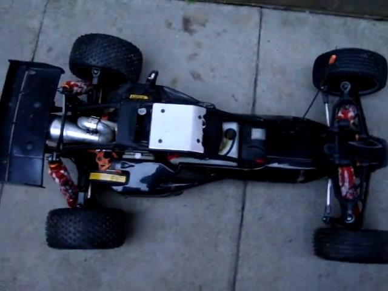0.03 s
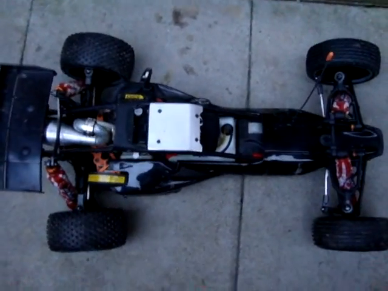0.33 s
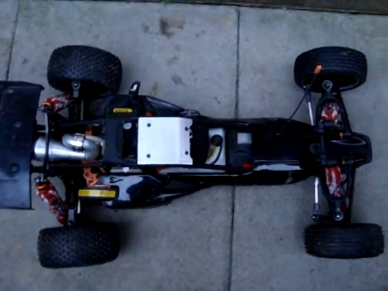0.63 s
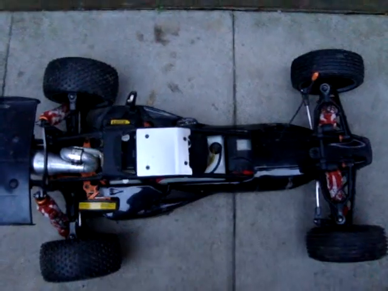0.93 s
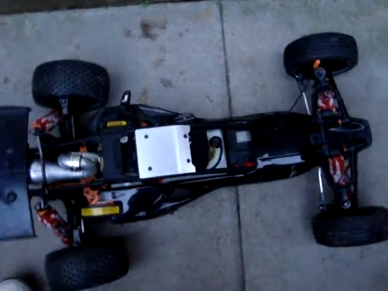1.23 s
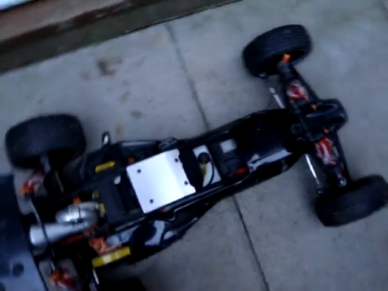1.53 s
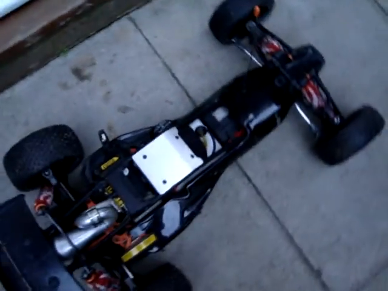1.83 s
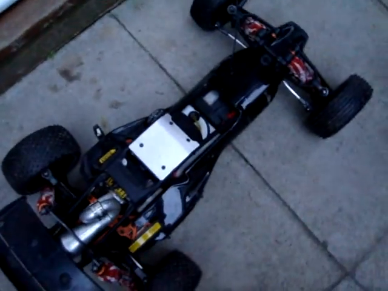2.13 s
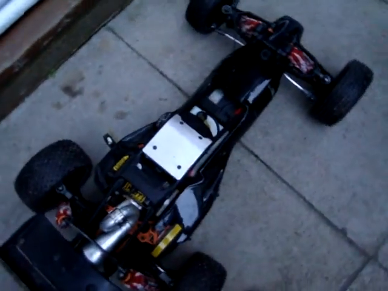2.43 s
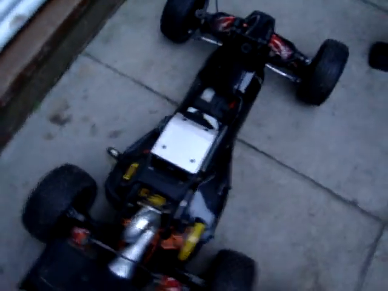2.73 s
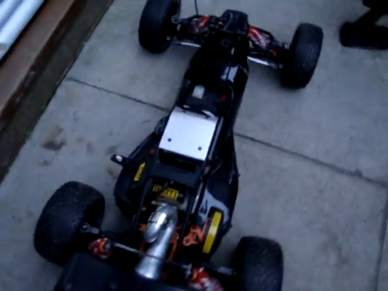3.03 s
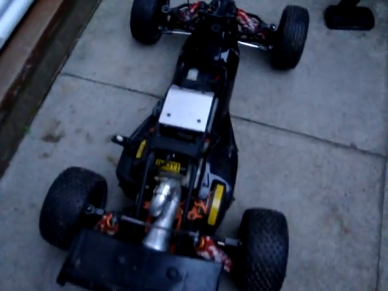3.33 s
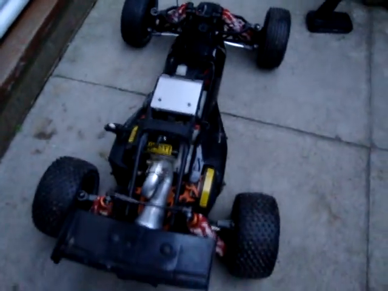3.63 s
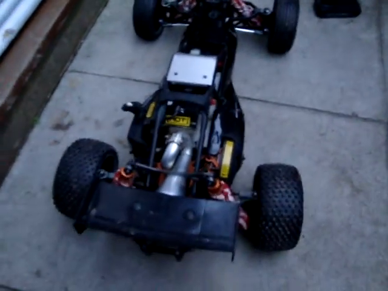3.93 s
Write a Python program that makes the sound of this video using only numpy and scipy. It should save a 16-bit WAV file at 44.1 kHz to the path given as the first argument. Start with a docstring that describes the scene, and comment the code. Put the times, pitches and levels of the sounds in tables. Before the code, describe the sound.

A small two-stroke model buggy engine idles close by throughout, with sharp, uneven, metallic pops, about a dozen a second, reflecting brightly off yard walls. From about 0.6 seconds it revs lightly: the pops crowd together over a louder drone and a faint whine. By 1.5 seconds it drops back to a sputtering idle, easing slightly near 4 seconds, over a faint outdoor background.

```python
"""The small two-stroke engine of a model buggy idles on paving in a walled yard, about 60 turns a second.
It mostly fires every fourth to sixth turn: each pop is a shock that echoes inside the exhaust pipe,
excites its modes and returns from the walls as a bright spray. Every turn drones, booms, puffs and
clatters, and the dragging clutch bell whines. Near one second the throttle opens and the pops crowd
together. The listener walks from the side round to the tail, over a faint outdoor background."""
import sys
import numpy as np
from scipy.fft import rfft, irfft, next_fast_len
from scipy.io import wavfile
from scipy.ndimage import uniform_filter1d, minimum_filter1d, map_coordinates

SR = 44100
rng = np.random.default_rng(int(sys.argv[2]) if len(sys.argv) > 2 else 0)


def inscribe(sig):
    """Save sig as 16-bit PCM at rate SR to the path in sys.argv[1].

    A 1-D sig is mono; a 2-D sig holds one channel per row.
    Samples are clipped to [-1, 1] before scaling.
    """
    pcm = np.round(np.clip(np.atleast_2d(sig).T, -1, 1) * 32767)
    wavfile.write(sys.argv[1], SR, pcm.astype(np.int16))


N = 176400
TIME = np.arange(N) / SR
IDLE_HZ, PIPE_ROUND_TRIP_S = 60.5, 0.00212

# Each row is one firing: start in seconds, then relative levels in dB of the pop, its treble over its
# midrange, the spray from the yard, the spray's top over the rest, and the gas jet.
FIRINGS = [(0.0487, -16, -4, -21.5, 2.5, -20), (0.115, -16.5, 8, -20.0, 4.5, -24),
           (0.1954, -18.5, 5, -21, 3.5, -23), (0.276, -21, 10, -22, 4.5, -21),
           (0.37, -21, 5, -24, 6.5, -20), (0.464, -15.5, -2, -23.5, 4.5, -26),
           (0.5919, -18, -20, -25.5, -3, -23.5), (0.6734, -16.5, -9, -21.5, 4, -20),
           (0.74, -16.5, 1, -22.0, -1, -20), (0.7915, -18.5, -4, -30, -3, -20),
           (0.8241, -15.5, -1, -24, 0, -17), (0.8737, -14.5, -12, -24.5, 1.5, -20),
           (0.94, -15.5, -13, -25.5, 0, -31), (0.9904, -15, -8, -27, -1, -19),
           (1.0411, -13.5, -5, -22.0, 3, -23), (1.1276, -15, -3, -28, -11, -15),
           (1.162, -17, -4, -30, -9, -17), (1.1975, -12.5, -7, -25, -2, -23.5),
           (1.2143, -17.5, -7, -31, 8.5, -23), (1.267, -13.5, -4, -23, -5, -16.5),
           (1.319, -15.5, 8, -22, 6, -23), (1.4067, -16, -7, -22.5, 7.5, -18),
           (1.4605, -20, -17, -31.0, -10, -27), (1.4785, -15.5, -4, -25.5, 4, -19),
           (1.548, -14, 9, -21.5, 4, -25), (1.6339, -19, 6, -21, 2, -18.5), (1.7332, -19, 1, -22.0, 5, -29),
           (1.8176, -17, 7, -22, 2.5, -29), (1.9015, -20, 11, -22.0, 3.5, -26),
           (1.986, -16, 7, -24.5, 2, -25), (2.0363, -20, -5, -29, -7, -24), (2.0532, -19, 1, -28, -4, -33),
           (2.1209, -19.5, 5, -21.0, 1, -31), (2.2043, -20, 3, -21, 3, -29),
           (2.289, -16.5, -1, -23, 1.5, -24), (2.3583, -18.5, 2, -30.5, -7, -18.5),
           (2.3916, -22, 2, -41, -16, -23), (2.4255, -20, 4, -22, 3.5, -19), (2.512, -18, 13, -20, 1, -31),
           (2.612, -18, 10, -22.5, 3, -32), (2.6955, -19.5, 13, -21.5, 3.5, -29),
           (2.7941, -17, 0, -22, 0.5, -31), (2.8751, -19.5, 4, -22.5, 4, -31),
           (2.9568, -19.5, 10, -23.5, 5, -35), (3.0387, -18.5, 3, -24.5, 4.5, -18.5),
           (3.1227, -17.5, 12, -23, 3.5, -23), (3.2211, -18, 12.5, -24, 4, -22),
           (3.3166, -18.5, -15, -23.5, 2.5, -26), (3.3836, -17, 8, -23, 5, -26),
           (3.4639, -19.5, -8, -22.5, 0, -19.5), (3.53, -17.5, -1, -23, 4.5, -31),
           (3.6123, -19.5, 6, -26, 5, -26), (3.7048, -19.5, -2, -24, 5, -32), (3.783, -23, 3, -24, 5, -24),
           (3.8637, -20, 1, -25, 4.5, -35), (3.9272, -24, -8, -26.0, 4.5, -22.5),
           (3.9937, -22, -10, -24, 7, -37)]
# Each row: time in seconds, throttle opening from 0 to 1.
THROTTLE = [(0, 0.52), (.4, 0.01), (.56, 0.53), (.75, 0.72), (1.0, 0.95), (1.31, 0.8), (1.35, 0.22),
            (1.7, 0.14), (2.4, 0.27), (2.8, 0), (4, 0)]
# The pipe's pitch sinks as the gas cools. Each row: time in seconds, pitch as a ratio.
PIPE_TUNE = [(0, 0.97), (1.4, 1), (2.4, 0.95), (3.0, .975), (3.9, 0.96)]


def amp(db):
    """Decibels to amplitude gain."""
    return 10 ** (np.asarray(db) / 20)


def unit(x):
    """Normalise to rms 1."""
    return x / np.sqrt(np.mean(x ** 2) + 1e-20)


def at(rows, s):
    """Linear interpolation of (seconds, value) rows."""
    return np.interp(s, *np.transpose(rows))


def colour(points, hz):
    """Gain of (Hz, dB) points interpolated on a log frequency axis."""
    f, db = np.transpose(points)
    return amp(np.interp(np.log(hz + 1), np.log(f + 1), db))


def wobble(rate):
    """A smooth random curve with rate knots a second."""
    return map_coordinates(rng.standard_normal(400), [TIME * rate], mode="wrap")


def filtered(x, response):
    """Linear filtering: the spectrum of x times a frequency response."""
    size = next_fast_len(len(x) + 8192)
    return irfft(rfft(x, size) * response(np.fft.rfftfreq(size, 1 / SR)), size)[:len(x)]


def coloured(x, points):
    """Filter by a spectrum of (Hz, dB) points, then normalise to rms 1."""
    return unit(filtered(x, lambda hz: colour(points, hz)))


def minimum_phase(gain):
    """The causal response with this gain, by folding the cepstrum."""
    cepstrum = irfft(np.log(np.maximum(gain, 1e-6)))
    half = len(cepstrum) // 2
    cepstrum[1:half] *= 2
    cepstrum[half + 1:] = 0
    return np.exp(rfft(cepstrum))


def add(track, start_s, sound):
    """Superpose a sound on the track."""
    i = max(round(start_s * SR), 0)
    part = track[i:i + len(sound)]
    part += sound[:len(part)]


def crank():
    """Turns made so far: a whole number between firings, smoothed by the flywheel's inertia."""
    starts = np.array(FIRINGS)[:, 0]
    starts = np.r_[starts[0] - 12 / IDLE_HZ, starts, starts[-1] + 12 / IDLE_HZ]
    between = np.maximum(np.round(np.diff(starts) * IDLE_HZ), 1)
    turns = np.interp(np.arange(-SR, N + SR) / SR, starts, np.r_[0, np.cumsum(between)])
    return uniform_filter1d(turns, size=4000)[SR:-SR]


def strokes(turns, decay_s, steady, turbulent, scatter_db, size=2048):
    """Amplitude-modulated noise: one burst a turn over a steady floor; the turbulent share never repeats."""
    count, part = np.divmod(turns, 1)
    age = part / IDLE_HZ
    repeating = rng.standard_normal(size)[(age * SR).astype(int)]
    grain = np.sqrt(1 - turbulent) * repeating + np.sqrt(turbulent) * rng.standard_normal(N)
    strength = amp(scatter_db * rng.uniform(-1, 1, size))
    return grain * (steady + np.exp(-age / decay_s) * strength[count.astype(int)])


def silencer_boom(turns):
    """Resonance: the gas pumped on each turn drives the cavities of the silencer and intake."""
    # Each row: centre in Hz, bandwidth in Hz, gain in dB.
    resonances = [(219, 35, -1), (287, 86, -0.5), (348, 69, 3), (418.4, 17.5, 5.5), (466, 146, -2),
                  (625.3, 45, 3.5), (678, 72, 1)]
    # The silencer's notches. Each row: frequency in Hz, gain in dB.
    notches = [(100, -24), (180, 0), (228, 2.5), (260, -5), (290, 1.5), (490, 1.5), (545, -12), (595, -2.5),
               (750, 1), (1500, -24)]

    def response(hz):
        modes = sum((-1) ** k * amp(db) * 1j * hz * width / (centre ** 2 - hz ** 2 + 1j * hz * width)
                    for k, (centre, width, db) in enumerate(resonances))
        return modes * colour(notches, hz)
    return unit(filtered(strokes(turns, decay_s=0.0071, steady=0.24, turbulent=1, scatter_db=0), response))


def puffs(turns):
    """Pulsating turbulent flow: every turn pushes out a puff of gas."""
    # Each row: frequency in Hz, gain in dB.
    spectrum = [(200, -35), (450, -11), (545, -2), (600, -4), (800, -6.5), (950, -8.5), (1080, 0.5),
                (1200, 1), (1380, -4.5), (1550, -14), (2100, -9.5), (4000, -24.5), (10000, -53)]
    flow = strokes(turns + .05, decay_s=0.0039, steady=0.82, turbulent=0.91, scatter_db=1)
    return coloured(flow, spectrum)


def piston_clatter(turns):
    """Impact noise: the piston rattles once a turn, with uneven strength."""
    # Each row: frequency in Hz, gain in dB.
    spectrum = [(300, -25.5), (1200, 0), (1800, 6.5), (3100, 5.5), (4500, -4.5), (6000, -10.5),
                (8000, -8.5), (10000, -15.5)]
    impacts = strokes(turns + .15, decay_s=0.0017, steady=.55, turbulent=0.95, scatter_db=4)
    return coloured(impacts, spectrum)


def clutch_bell(centre_hz=1072, half_width_hz=17):
    """Friction excites one narrow resonance of the dragging clutch bell."""
    # Each row: time in seconds, relative level in dB.
    levels = [(0, -35), (.35, -38.5), (.57, -29.5), (.75, -35), (1.0, -31), (1.3, -42), (1.5, -52),
              (3.1, -41.5), (3.55, -39.5), (4, -48)]
    whine = filtered(rng.standard_normal(N), lambda hz: 1 / (1 + ((hz - centre_hz) / half_width_hz) ** 2))
    return amp(at(levels, TIME) - 1) * unit(whine)


def intake_drone(turns):
    """Periodic intake flow radiates crank harmonics, most of which swell as the throttle opens."""
    # Each row: multiple of the crank speed, relative level in dB at idle and with the throttle open.
    harmonics = [(3, -52, -47.5), (4, -50.5, -52), (5, -48, -39.5), (6, -53, -40), (7, -46, -28.5),
                 (8, -47, -54.5), (10, -52, -35), (18, -56, -41)]
    opening, out = at(THROTTLE, TIME), np.zeros(N)
    for multiple, idle_db, open_db in harmonics:
        db = idle_db + (open_db - idle_db) * opening + 0.5 + wobble(12)
        phase = 2 * np.pi * (multiple * turns + rng.random()) + .1 * wobble(7.5)
        out += amp(db) * np.sin(phase)
    return np.sqrt(2) * amp(-0.7 * TIME) * out  # fades as the listener leaves the intake


def running():
    """Superposition of the sounds the engine makes on every turn, fired or not."""
    # Each row: time in seconds, then relative levels in dB of boom, puffs and clatter.
    levels = [(0.0, -27, -26.5, -26.5), (0.31, -32.5, -31, -35.5), (0.44, -31, -30.5, -30),
              (0.93, -23.5, -26.5, -27), (1.11, -24, -27, -26.5), (1.3, -19.5, -27.5, -28.5),
              (1.35, -26, -33, -28), (1.51, -23.5, -28.5, -32), (1.78, -31, -33, -34.5),
              (2.27, -30, -32, -32.5), (2.54, -28.5, -33, -33), (3.24, -34, -33.5, -35.5),
              (3.41, -28, -32, -31.5), (4.0, -38.5, -37.5, -39)]
    times, *columns = np.transpose(levels)
    boom_db, puff_db, clatter_db = [np.interp(TIME, times, column) for column in columns]
    turns = crank()
    return (amp(boom_db - 9) * silencer_boom(turns) + amp(puff_db - 2) * puffs(turns)
            + amp(clatter_db - 0.5) * piston_clatter(turns) + clutch_bell() + intake_drone(turns))


def open_air():
    """Stationary outdoor background noise, strongest at low frequencies."""
    # Each row: frequency in Hz, gain in dB.
    spectrum = [(20, -20), (120, 17.5), (500, 16), (10000, -31)]
    return amp(-57.5) * coloured(rng.standard_normal(N), spectrum)


def pop(treble_db, tune, opening, size=4096):
    """Comb filtering: a shock is joined by its reflections along the pipe and off the nearest wall."""
    # The shock leaving the pipe, then the bark and the blunting that an open throttle gives it.
    # Each row: frequency in Hz, gain in dB.
    spectrum = [(30, -47), (130, -48), (300, -18.5), (700, -6.5), (1000, 3), (1400, -0.5), (1800, 4.5),
                (3000, -8.5), (4500, -7.5), (6300, 0.5), (8000, 15), (10000, 29), (16000, -74)]
    bark = [(900, -3), (1130, 6.5), (1350, 14), (1580, -5.5), (2000, -7), (3000, -2.5)]
    blunting = [(3000, -0.5), (9000, -3)]
    first_return, later_returns, wall_delay_s = .62, .5, 0.013
    hz = np.fft.rfftfreq(size, 1 / SR)
    treble = colour([(1400, 0.002), (3800, treble_db), (8500, 0.01)], hz)
    throttle = (colour(bark, hz) * colour(blunting, hz)) ** opening
    shock = minimum_phase(colour(spectrum, hz) * treble * throttle / np.hypot(1, (hz / 4800) ** 6))
    trip_s = PIPE_ROUND_TRIP_S / tune + .00005 * rng.standard_normal()
    trip = np.exp(-2j * np.pi * hz * trip_s) / np.hypot(1, hz / 6500)  # each trip loses treble
    direct = shock * (1 + first_return * trip / (1 - later_returns * trip))
    wall = amp(-9.5) * np.exp(-2j * np.pi * hz * wall_delay_s) / (1 + 1j * hz / 2200)
    midrange = irfft(direct * (hz > 800) * (hz < 2500))  # its energy sets the scale
    return -irfft(direct * (1 + wall)) * np.sqrt(0.0055 * SR) / np.linalg.norm(midrange)


def gas_jet(rise_s=0.0016, decay_s=0.005, size=2048):
    """Jet noise: a short turbulent rush of gas follows the shock."""
    # Each row: frequency in Hz, gain in dB.
    spectrum = [(500, -23.5), (1300, 8), (1600, -8.5), (2100, 0), (3600, 1), (10000, -11.5)]
    t = np.arange(size) / SR
    swell = (1 - np.exp(-t / rise_s)) * np.exp(-t / decay_s)
    return coloured(rng.standard_normal(size), spectrum) * swell / swell.max()


def thump(start, decay_s=0.00076, size=6144):
    """The push of gas from the tailpipe radiates a one-sided pressure pulse."""
    # Strongest behind the tailpipe. Each row: time in seconds, peak level in dB.
    levels = [(.2, -37), (.9, -50.5), (3.7, -34)]
    return -amp(at(levels, start)) * np.exp(-np.arange(size) / SR / decay_s)


def pipe_ring(start, tune, rise_s=.002, t60=0.12, size=6144):
    """Free vibration: the exhaust's modes decay after a firing, each with its own directivity."""
    # Each row: frequency in Hz, relative level in dB at the side and behind the tail.
    modes = [(404.4, -9.5, -22), (680.4, -6, -17.5), (960, -8, -10), (1418, -10.5, -26), (1846, -4.5, -3),
             (2123, -4, -11.5), (2322, -3, -7.5), (2804, -5.5, -3.5), (2950, -7.5, -11), (3310, -14, 0),
             (3556, -3.5, -7.5), (4075, -3, -9), (4510, -5.5, -8.5), (4910, -3, -11), (6100, -6.5, -6.5)]
    # Each row: time in seconds, the listener's position from side (0) to tail (1).
    walk = [(1.3, 0.08), (3.2, 0.98)]
    t = np.arange(size) / SR
    hz, side_db, tail_db = np.transpose(modes)[:, :, None]
    hz = hz * np.where(hz < 2500, tune, 1)  # higher modes belong to the metal and keep their pitch
    cycles = hz * (1 + 0.0065 * rng.standard_normal(hz.shape)) * t + rng.random(hz.shape)
    mode_db = side_db + (tail_db - side_db) * at(walk, start) + 3.5 * rng.standard_normal(hz.shape)
    ring = amp(mode_db - 60 * t / t60) * np.sin(2 * np.pi * cycles)
    return ring.sum(0) * (1 - np.exp(-t / rise_s))


def exhaust():
    """Impulsive excitation: each firing sends out a shock, a jet and a thump, and rings the pipe."""
    out = np.zeros(N)
    for start, pop_db, treble_db, spray_db, _, jet_db in FIRINGS:
        tune = at(PIPE_TUNE, start)
        ring_db = spray_db + .35 * (pop_db - spray_db) - .5
        add(out, start, amp(pop_db - 3) * pop(treble_db, tune, at(THROTTLE, start)))
        add(out, start, amp(jet_db - 0.5) * gas_jet())
        add(out, start, thump(start))
        add(out, start, amp(ring_db) * pipe_ring(start, tune))
    return out


def yard_spray(lead_s=.005, hold_s=0.022, fresh_share=.3, size=8192):
    """Diffuse reflection: the walls return each pop as a bright spray of noise; a faint knock leads it."""
    # Each row: frequency in Hz, gain in dB.
    spectrum = [(150, -34), (400, -17.5), (800, -9.5), (1300, -2), (1550, -15.5), (1800, 0.5),
                (2050, -12.5), (2900, 3.5), (4000, 3.5), (5000, 1.5), (6300, -2), (8000, -6), (10000, -11)]
    t = np.arange(size) / SR - lead_s
    after = np.maximum(t, 0)
    knock = amp(-8) * np.exp(-after / lead_s) * np.minimum(1 + t / lead_s, 1)

    def envelope(rise_s, t60):
        return knock + (1 - np.exp(-after / rise_s)) * amp(-60 * np.maximum(t - hold_s, 0) / t60)

    def pipe_comb(hz, tune):
        trip = np.exp(-2j * np.pi * hz * PIPE_ROUND_TRIP_S / tune) / np.hypot(1, hz / 9000)
        return 1 / (1 - .45 * trip)
    out, pattern = np.zeros(N), rng.standard_normal(size)
    for start, _, _, spray_db, top_db, _ in FIRINGS:
        # The pattern of reflections drifts as the listener moves.
        pattern = np.sqrt(1 - fresh_share) * pattern + np.sqrt(fresh_share) * rng.standard_normal(size)
        tune = at(PIPE_TUNE, start)
        spray = unit(filtered(pattern, lambda hz: colour(spectrum, hz) * pipe_comb(hz, tune)))
        lows = filtered(spray, lambda hz: 1 / (1 + (hz / 6200) ** 8))
        body = lows * envelope(rise_s=0.0006, t60=0.13)
        hiss = amp(top_db) * (spray - lows) * envelope(rise_s=0.0015, t60=0.077)
        add(out, start - lead_s, amp(spray_db - 1.5) * (body + hiss))
    return out


def scene():
    """Superposition of the open air, the engine and its yard in one channel."""
    return (open_air() + exhaust() + yard_spray() + running())[None]


def record(dry, ceiling=.7, top_hz=10150):
    """Peak limiting holds down the tallest shocks; a steep low-pass then limits the bandwidth."""
    needed = np.minimum(ceiling / (abs(dry[0]) + 1e-9), 1)
    gain = uniform_filter1d(minimum_filter1d(needed, size=41), size=41)
    return filtered(dry[0] * gain, lambda hz: 1 / np.hypot(1, (hz / top_hz) ** 80))[None]


dry = scene()
out = record(dry)
inscribe(out)
```